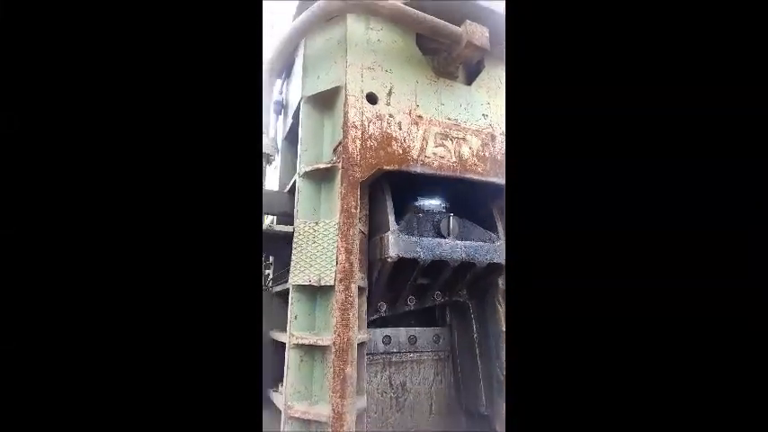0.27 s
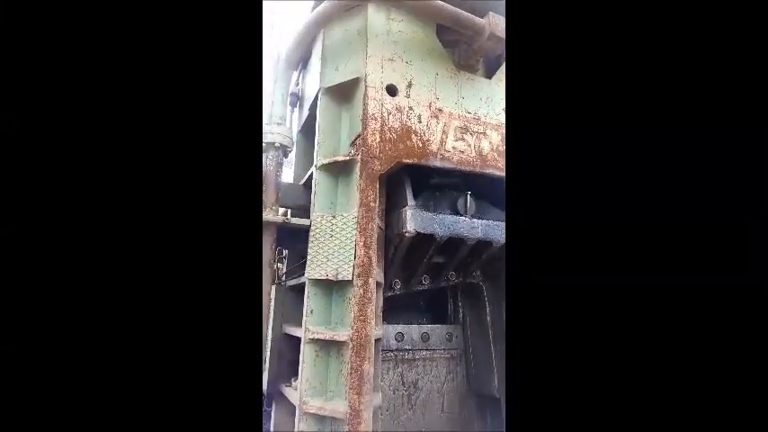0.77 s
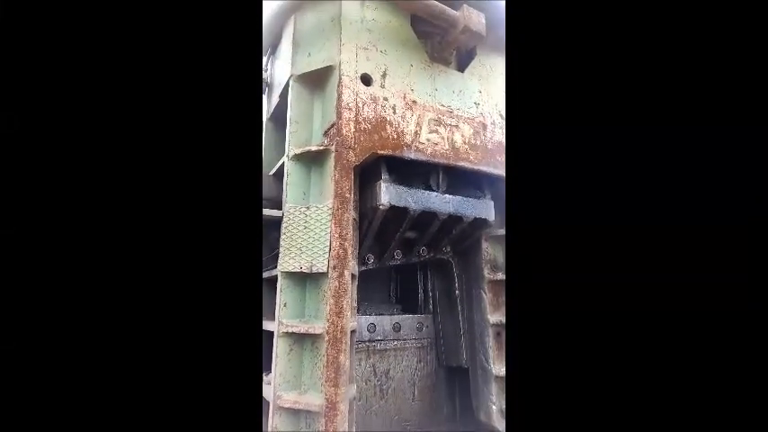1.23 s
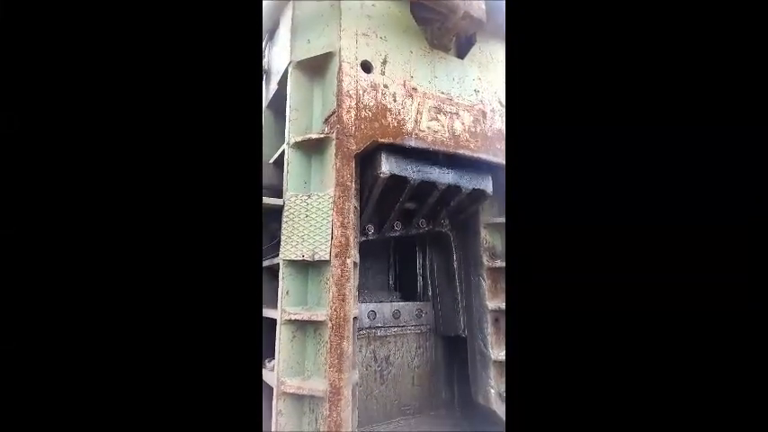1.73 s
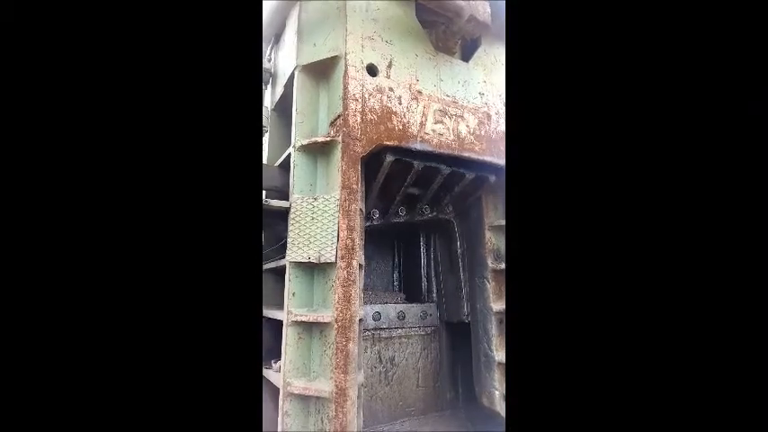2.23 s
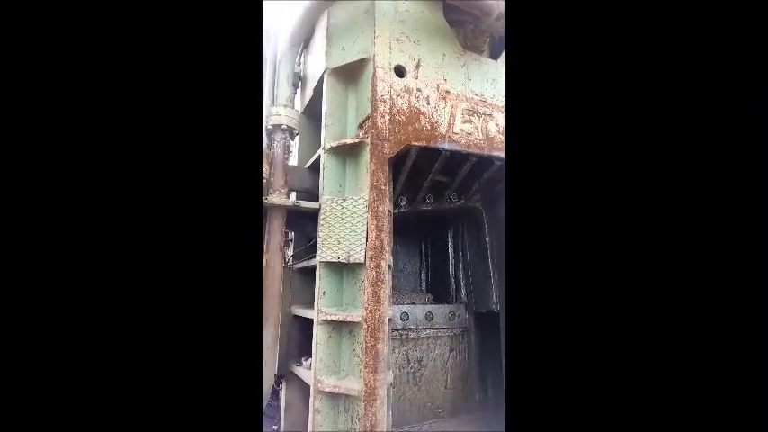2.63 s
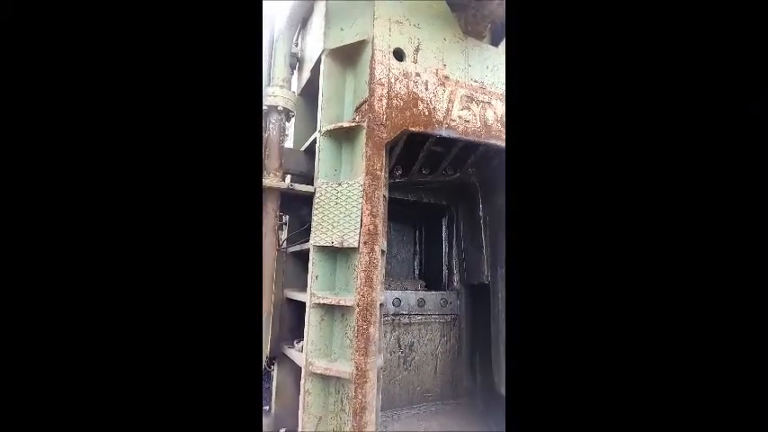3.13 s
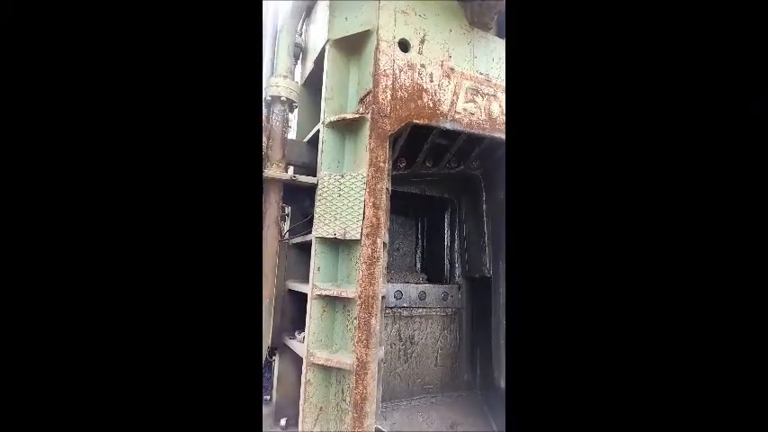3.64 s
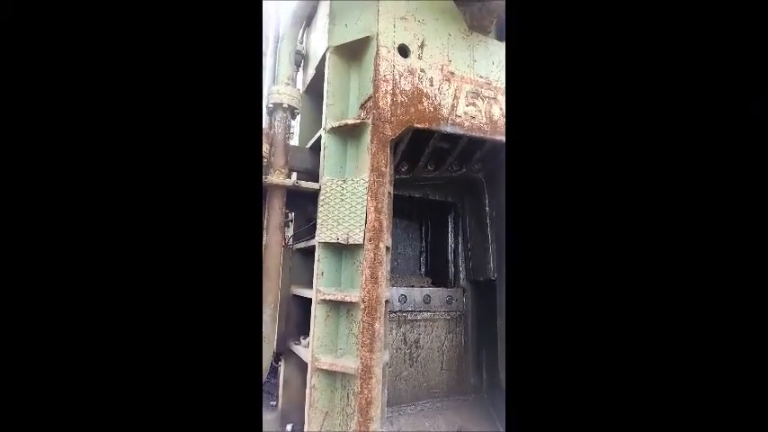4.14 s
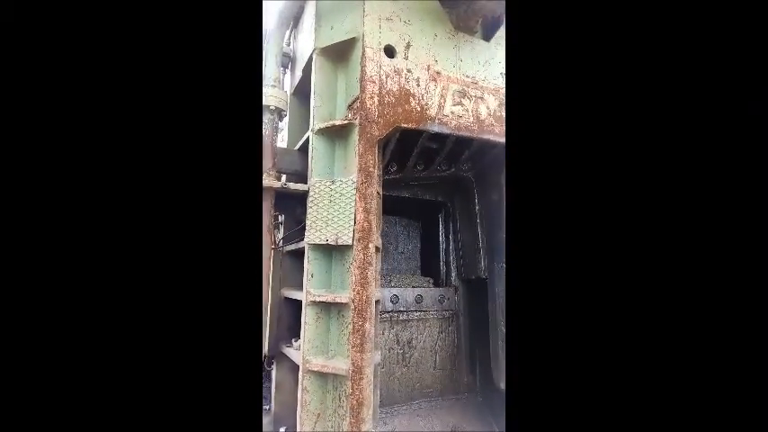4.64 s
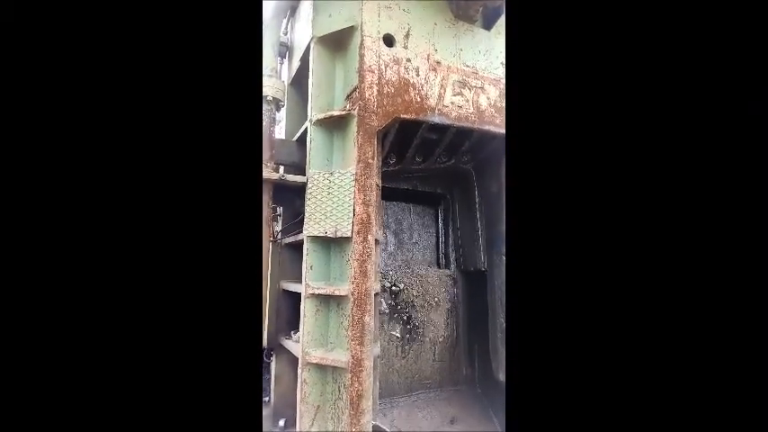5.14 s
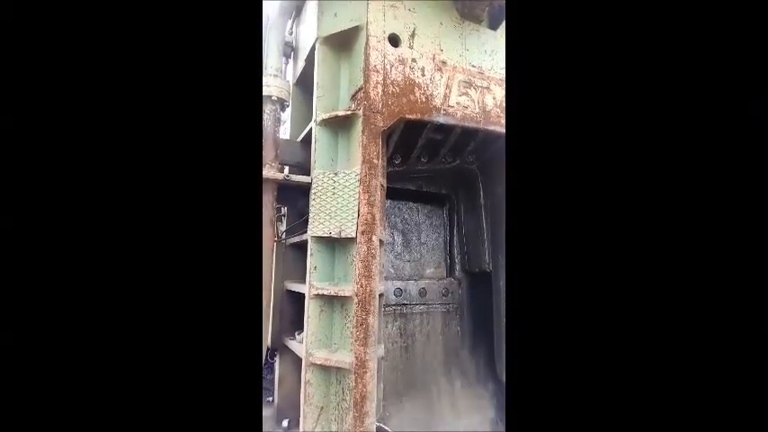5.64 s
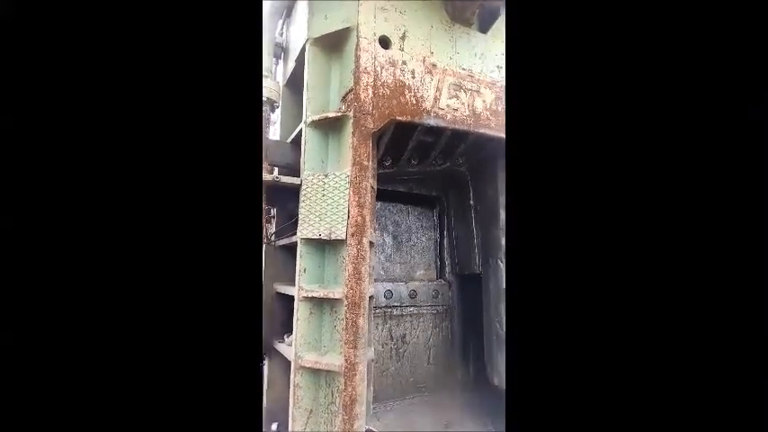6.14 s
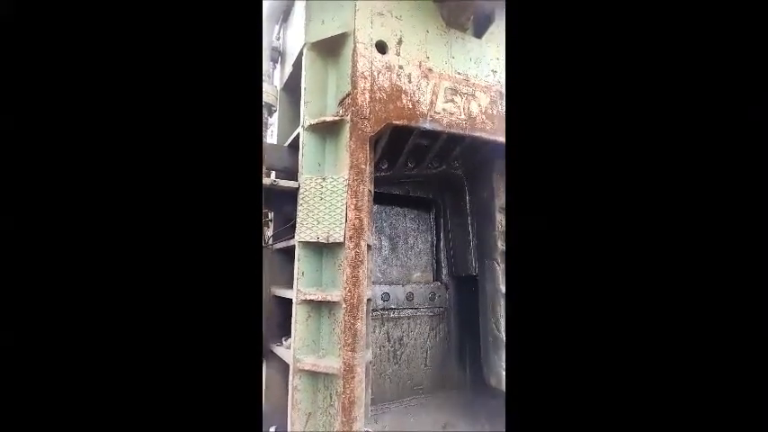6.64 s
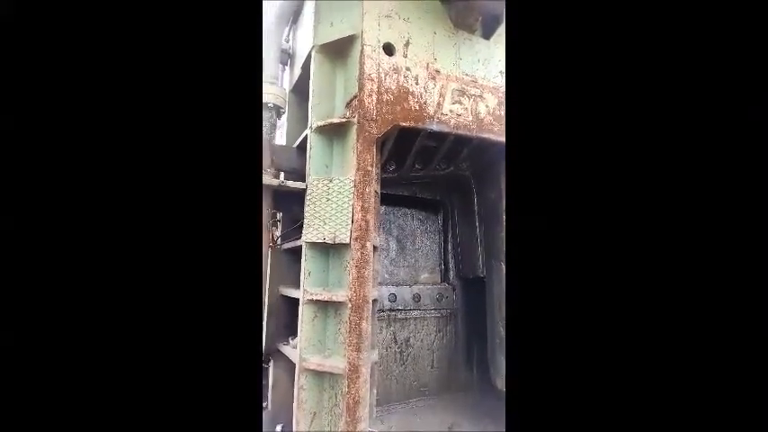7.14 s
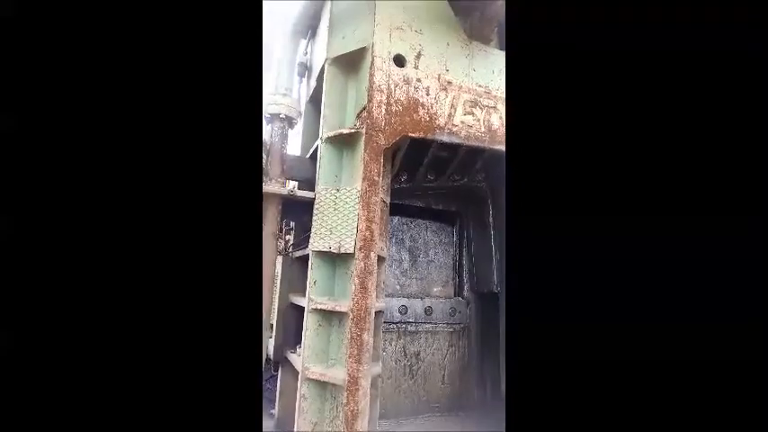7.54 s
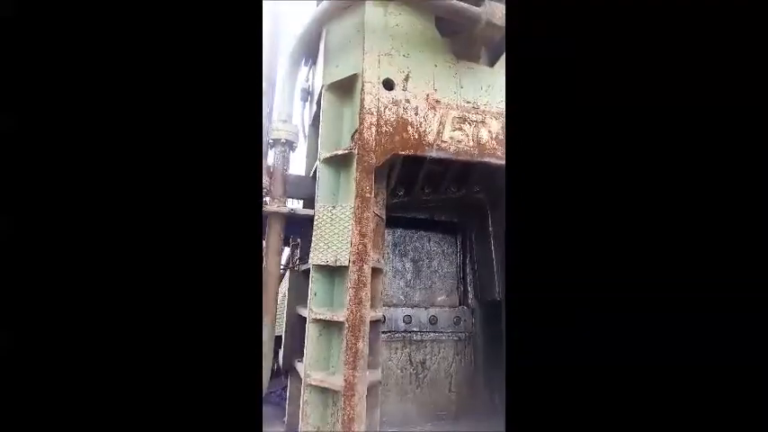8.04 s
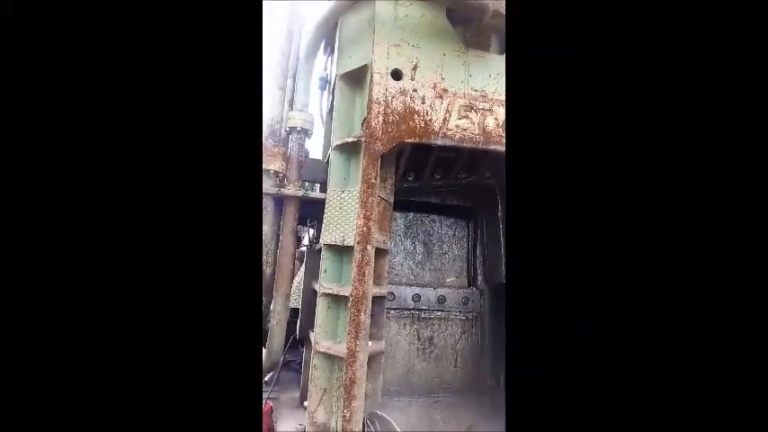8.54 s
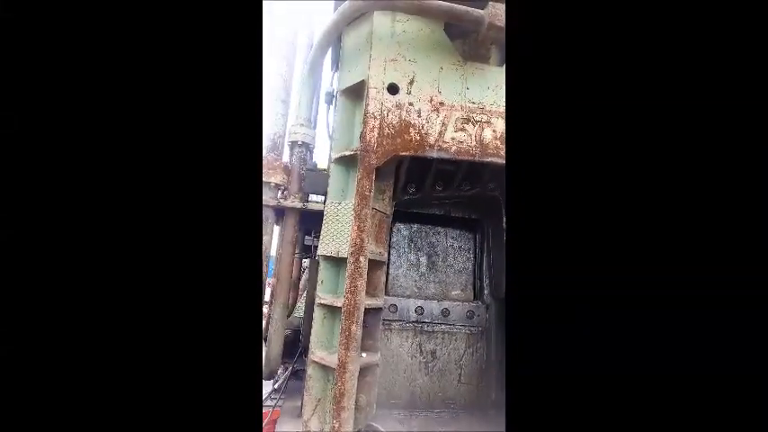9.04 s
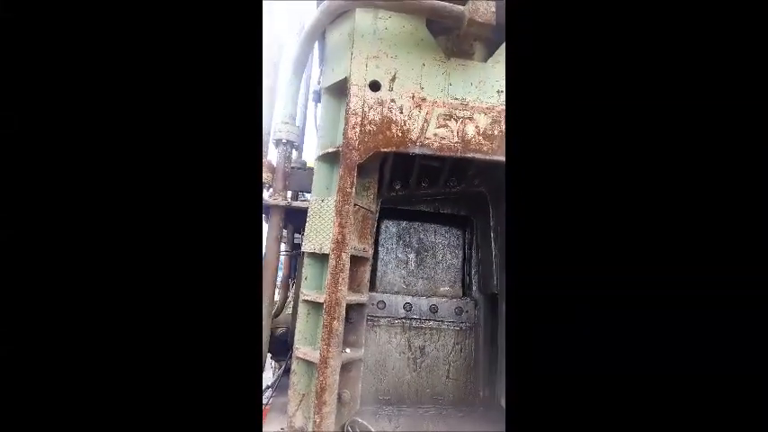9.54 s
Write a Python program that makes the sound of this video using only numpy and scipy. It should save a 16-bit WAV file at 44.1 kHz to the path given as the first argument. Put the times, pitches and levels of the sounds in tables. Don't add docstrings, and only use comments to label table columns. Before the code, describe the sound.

Outdoors in a scrapyard, a few metres from a large hydraulic shear, heard through a phone. Low pump whine and broad motor roar swell up, with hissing oil. A hard double knock on plate makes the level dive, followed by thin high squealing chatter. The drone returns, another blow lands, scrap tumbles down rattling and ringing, and the machine hums on alone.

```python
import sys
import numpy as np
from scipy import signal
from scipy.fft import rfft, irfft
from scipy.io import wavfile
from scipy.ndimage import uniform_filter1d

SR = 44100
rng = np.random.default_rng(int(sys.argv[2]) if len(sys.argv) > 2 else 0)


def volts_from_db(level):
    exponent = np.asarray(level, float) / 20
    return 10 ** exponent


def store_pcm(level_fs):
    pcm = np.round(np.clip(level_fs, -1, 1) * 32767).astype(np.int16)
    wavfile.write(sys.argv[1], SR, np.atleast_2d(pcm).T)


N = 431738
T = np.arange(N) / SR
HZ = np.fft.rfftfreq(N, 1 / SR) + 1e-3

# (time [s], level [dB])
GAIN = [(0, -15.5), (.4, -11), (1.3, -2), (2.2, 0), (3.32, -1), (3.4, -13), (3.65, -9), (4.06, -8),
        (4.4, -2.5), (4.75, -1), (5.38, -.5), (5.47, -7.5), (6.33, -5.5), (6.5, -6.5), (7.1, -0.24),
        (7.9, 0.3), (8.0, -1), (9.79, 0.26)]


def on_time(table):
    s, *columns = np.transpose(table)
    return [np.interp(T, s, c) for c in columns]


def on_hz(table):
    hz, *columns = np.transpose(table)
    return [np.interp(np.log(HZ), np.log(hz), c) for c in columns]


def in_stages(table):
    changeover_s = 0.093
    s, *columns = np.transpose(table)
    row = np.maximum(np.searchsorted(s, T, side="right") - 1, 0)
    return [uniform_filter1d(c[row], int(changeover_s * SR)) for c in columns]


def walk(rate):
    hold = int(SR / rate)
    steps = np.repeat(rng.standard_normal(N // hold + 1), hold)
    return 1.368 * uniform_filter1d(uniform_filter1d(steps, hold), hold)[:N]


def unit(x):
    return x / np.sqrt(np.mean(x ** 2))


def panned(x, pan_db):
    return x * volts_from_db(np.array([[pan_db], [-pan_db]]) / 2)


def ports(source, scattered=0.):
    # (frequency [Hz], left minus right [dB], share from the far side [0-1], unrelated share [0-1])
    port_curves = [(30, 7, 0.6, 0.1), (90, -0.5, .1, 0.21), (250, -4.5, 0.12, 0.27), (454, -4.5, 0.3, 0.34),
                   (760, -4, 0.4, 0.09), (1450, 1.2, 0.52, 0.02), (2450, 0.8, 0.87, 0.02),
                   (3400, -4.5, 0.9, 0.18), (4400, 3.5, 0.25, 0.54), (5230, 1.2, .9, 0.14),
                   (7300, 1, 0.8, 0.55), (9800, 2, .55, 0.62), (11000, -2.5, 0.2, 0.14),
                   (12400, -1, 0.1, 0.4), (14200, -3, 0, 0.04), (15100, 3, .01, 0.14)]
    # (frequency [Hz], lag [half turns])
    port_lag = [(60, .14), (260, .05), (430, .14), (800, .02), (1290, 0), (2450, .93), (2780, 1.07),
                (4950, 2.92), (5500, 3.08), (7800, 5), (10200, 7), (12850, 9), (15110, 11), (15600, 11.4)]
    pan_db, far, alone = on_hz(port_curves)
    far = np.clip(far, 0, 1) / 2
    alone = np.clip(alone + scattered, 0, 1)
    turn = np.exp(.5j * np.pi * np.interp(HZ, *np.transpose(port_lag)))
    turns = np.array([turn.conj(), turn])
    near, other, left, right = (rfft(source()) for _ in range(4))
    shared = np.sqrt(1 - far) * near * turns + np.sqrt(far) * other * turns.conj()
    both = np.sqrt(1 - alone) * shared + np.sqrt(alone) * np.array([left, right])
    return irfft(both * volts_from_db(np.array([pan_db, -pan_db]) / 2), N)


def roar_db():
    # (start [s], frame rumble [dB], motors [dB], oil [dB], fans [dB])
    stages = [
        (0, -27, -24.5, -29.5, -25.5),
        (3.36, -24.5, -23, -29.5, -26.5),
        (4.2, -25.5, -23.5, -31, -26),
        (5.6, -26.5, -22.5, -29.5, -26),
        (6.45, -24, -22.5, -30.5, -26),
        (8.8, -24.5, -25, -31.5, -27),
        (9.5, -25, -24.5, -31.5, -29.5),
    ]
    pour_rise = [0.5, -1, 4, 7.5]
    start_s, rise_s, hold_s, fall_s = 5.49, 0.14, 0.39, .25
    pour = np.interp(T, np.cumsum([start_s, rise_s, hold_s, fall_s]), [0, 1, 1, 0])
    gain_db = on_time(GAIN)[0]
    return [db + more * pour + gain_db for db, more in zip(in_stages(stages), pour_rise)]


def tone(phase, db, pan_db, wobble):
    level = np.sqrt(2) * volts_from_db(db + 0.58 * walk(9))
    return panned(level * np.sin(phase + wobble * walk(14)), pan_db)


def pumps():
    # (start [s], piston rate [Hz], multiple 1 [dB], multiple 2 [dB], multiple 5 [dB])
    piston_stages = [(0, 208.8, -17, -37.5, -47), (1.7, 209, -18.5, -34, -52), (3.36, 209.6, -13, -32, -40),
                     (3.56, 209.8, -13.5, -31.5, -30), (3.87, 209.5, -32.5, -34.5, -52),
                     (4.76, 208.6, -20, -37, -50), (4.88, 207, -21, -22.5, -57),
                     (5.4, 208.9, -30, -37.5, -49), (7.6, 209.2, -29.5, -40.5, -46),
                     (8.8, 208.2, -28, -33, -48)]
    piston_pans = [-4, 5, 2, -5, -1, 1.5]
    # (time [s], tooth rate [Hz], level [dB])
    gear_line = [(0, 324.7, -51), (.6, 329.4, -46), (1.5, 330, -33), (3.25, 330, -31.5), (3.36, 327.3, -49),
                 (4.7, 334, -35), (5, 327, -36), (5.35, 329, -36), (5.5, 328.5, -50.5), (9.79, 333, -55)]
    hz, first, second, fifth = in_stages(piston_stages)
    phase = 2 * np.pi * np.cumsum(hz + 0.6045 * walk(3)) / SR
    orders = [1, 2, 3, 4, 5, 7.04]
    levels = [first, second, first - 21, first - 24.5, fifth, -36.5]
    gain_db = on_time(GAIN)[0]
    out = np.zeros((2, N))
    for k, db, pan_db in zip(orders, levels, piston_pans):
        sway_db = min(k - 1, 1) * 2.4 * walk(6)
        out += tone(k * phase, db + gain_db + sway_db, pan_db, wobble=0.17 * k)
    hz, db = on_time(gear_line)
    gear_phase = 2 * np.pi * np.cumsum(hz) / SR
    return out + tone(gear_phase, db - .3 + 0.66 * walk(4.1), -12.0, wobble=0.28)


def knocks():
    # (time [s], level [dB], low mode [Hz], high mode [Hz], t60 [s])
    ram_knocks = [
        (3.322, -31, 1250, 2850, .17),
        (3.349, -10.5, 599, 785, .14),
        (3.353, -16.5, 459, 694, 0.39),
        (5.395, -11, 1447, 1540, 0.12),
    ]
    chute_knocks = [
        (5.801, -12, 598, 944, .11),
        (5.835, -24, 611, 924, 0.15),
        (5.971, -19.5, 697, 972, 0.13),
        (6.05, -20.5, 1265, 994, 0.24),
        (6.195, -18, 657, 1350, .2),
    ]
    ram_pan_db, chute_pan_db = -1, -8.5
    out, t = np.zeros((2, N + SR)), T[:SR // 2]
    blows = [(*row, ram_pan_db) for row in ram_knocks] + [(*row, chute_pan_db) for row in chute_knocks]
    for s, db, low_hz, high_hz, t60, pan_db in blows:
        hz = np.array([[low_hz], [high_hz], [1.08 * low_hz], [.93 * high_hz]])
        ring = np.array([0.95, 0.74, 0.23, 0.31]) @ np.sin(2 * np.pi * hz * t)
        attack = np.minimum(t / 0.00058, 1)
        out[:, int(s * SR):][:, :len(t)] += panned(volts_from_db(db - 60 * t / t60) * ring * attack, pan_db)
    return out[:, :N]


def clatter():
    # (time [s], level [dB], centre [Hz], rattle time [s], spread [octaves])
    jolts = [(3.311, -15.5, 11000, .004, 0.73), (3.319, -11.5, 1640, .0092, 0.85),
             (3.346, -17.5, 8000, 0.0026, 1.2), (3.349, -14, 900, 0.0084, 0.66),
             (3.36, -20, 520, 0.036, 0.97), (4.212, -21, 120, .025, 0.61), (4.27, -19.5, 400, 0.043, 0.99),
             (5.394, -14, 5960, 0.0074, 2.1), (5.39, -21, 75, .02, .48), (5.41, -16.5, 740, 0.073, .9),
             (3.325, -26.5, 85, 0.034, 0.36), (3.35, -19.5, 1900, 0.0028, 0.67),
             (5.44, -23, 141, 0.057, 0.74), (5.505, -17, 400, .008, 1), (7.88, -20.5, 1502, .014, 1.8),
             (7.91, -25, 1500, 0.0084, 1.6)]
    # (time [s], level [dB], centre [Hz], rattle time [s])
    falls = [(4.531, -18, 6760, 0.01), (4.585, -27, 11000, .008), (4.715, -26.5, 9000, .009),
             (4.831, -22.5, 8000, 0.012), (5.23, -25, 9000, .007), (5.479, -29, 11000, .0015),
             (5.483, -22, 11000, .002), (5.498, -23, 9000, .0015), (5.548, -24, 14000, 0.0069),
             (5.625, -21.5, 9000, 0.026), (5.649, -23.5, 7040, 0.032), (5.722, -20, 9960, 0.0019),
             (5.73, -18, 9100, 0.0022), (5.755, -19.5, 3400, 0.014), (5.761, -17, 9000, .031),
             (5.913, -14, 14040, .002), (5.918, -10.5, 11000, 0.0025), (5.921, -21.5, 7960, 0.022),
             (6.015, -20.5, 5530, .03), (6.062, -26, 2480, 0.03), (6.114, -20.5, 10000, 0.023),
             (6.192, -19, 2300, 0.021), (6.31, -23.5, 752, 0.0086), (6.405, -23, 800, .014),
             (6.355, -29, 8060, .0013), (6.368, -18, 12100, .004), (6.369, -20.5, 10100, 0.028)]
    fall_spread_oct, ring_db = 0.96, 4
    tail_per_rattle = 10.7
    out, t = np.zeros(N + SR), T[:SR // 2]
    f = np.fft.rfftfreq(len(t), 1 / SR) + 1
    for s, db, centre_hz, hold, spread in [*jolts, *[(*row, fall_spread_oct) for row in falls]]:
        grit_db = 4 * np.repeat(rng.standard_normal(len(t) // 45), 45)
        contacts = rng.standard_normal(len(t)) * volts_from_db(grit_db)
        colour = np.exp(-.5 * (np.log2(f / centre_hz) / spread) ** 2) / np.sqrt(f)
        favour = np.interp(f, np.arange(0, SR / 2, 60), rng.standard_normal(SR // 120 + 1))
        colour = colour * volts_from_db(ring_db * favour)
        attack = np.minimum(t / (0.0015 + 0.047 * hold), 1)
        tail = volts_from_db(-60 * np.maximum(t - hold, 0) / (tail_per_rattle * hold))
        rattle = unit(irfft(rfft(contacts) * colour, len(t)))
        out[int(s * SR):][:len(t)] += volts_from_db(db) * rattle * tail * attack
    return out[:N]


def scrap():
    # (time [s], level [dB], three modes [Hz])
    struck_pieces = [(4.532, -34, 3760, 10820, 15460), (5.396, -35, 3520, 7150, 15288),
                     (5.63, -35, 5329, 10260, 11638), (5.757, -21.5, 3560, 8677, 10680),
                     (5.76, -37, 8225, 8957, 3470), (5.92, -36, 9410, 10560, 12575),
                     (5.921, -39, 2220, 5996, 15385), (6.02, -23.5, 3620, 5070, 8419),
                     (6.022, -25.5, 3440, 5996, 4400), (6.117, -24, 14814, 12930, 8279),
                     (6.12, -45, 3930, 6430, 9668), (6.024, -35, 2460, 7600, 10777),
                     (5.762, -32, 9571, 4340, 11910), (6.376, -29, 10088, 11430, 4970),
                     (6.196, -28.5, 1830, 2250, 2476), (6.2, -27.5, 4580, 5100, 5178),
                     (6.372, -19, 15180, 10766, 14200), (6.372, -28.5, 6020, 5300, 9600),
                     (6.4, -30, 1675, 1785, 15331)]
    t60_s, damping = .4, .5
    out, t = np.zeros(N + SR), T[:SR // 2]
    for s, db, *hz in struck_pieces:
        pairs = np.outer([1, 1.013], hz).reshape(-1, 1)
        fade = volts_from_db(-60 * t / t60_s * (pairs / 4000) ** damping)
        modes = fade * np.sin(2 * np.pi * (pairs * t + rng.random(pairs.shape)))
        ring = np.array([1.2, 1.1, 1, .8, .75, .7]) @ modes
        out[int(s * SR):][:len(t)] += volts_from_db(db) * ring * np.minimum(t / 0.0017, 1)
    return out[:N]


def squeal():
    # (frequency [Hz], level [dB])
    plate_modes = [(11084, 0), (12730, 5), (13290, 6), (14470, 11)]
    # (time [s], level [dB])
    pings = [(3.37, -46), (3.41, -47), (3.472, -33), (3.52, -44), (3.557, -34), (3.58, -43), (3.61, -44),
             (3.657, -37), (3.69, -45), (3.748, -36), (3.785, -30)]
    out, t = np.zeros(N), T[:SR // 4]
    hz, mode_db = np.transpose(plate_modes)[:, :, None]
    for s, db in pings:
        loss, phase = rng.random((2, len(plate_modes), 1))
        fade = volts_from_db(mode_db - 6 * loss - 60 * t / .13)
        ping = fade * np.sin(2 * np.pi * (hz * t + phase))
        out[int(s * SR):][:len(t)] += volts_from_db(db) * ping.sum(axis=0) * np.minimum(t / .004, 1)
    return out


def oil_return(hz=5050, width_hz=400, db=-10, end_s=3.33):
    band = np.exp(-.5 * ((HZ - hz) / width_hz) ** 2)
    hiss = irfft(rfft(rng.standard_normal((2, N))) * band, N)
    return unit(hiss) * volts_from_db(roar_db()[2] + db) * (T < end_s)


def roar():
    region_edges = [300, 2400, 10000]
    region_trims = [3.47, 1.52, 3.2, 4.15]
    # (frequency [Hz], level per Hz [dB])
    turbulence = [(25, -22), (60, -9.5), (110, -4.5), (190, 8), (280, 0), (500, -4.5), (900, -6.5),
                  (1450, -6.5), (2300, -10), (4000, -12), (6000, -16), (9500, -19.5), (13800, -14.5),
                  (15400, -11.5)]
    # (frequency [Hz], width [Hz], boost [dB])
    housings = [(89.5, 7, 4), (125, 12, 2.5), (255, 18, 4), (590, 7.3, 12), (1212, 25, 7), (1378, 26, 4),
                (1818, 13, 7.5), (2000, 17, 5.5), (3840, 40, 5.5), (13830, 500, 5.5)]
    flutter_db = [0.71, 1.33, 1.08, 1.03]
    shape = volts_from_db(on_hz(turbulence)[0])
    for hz, width, db in housings:
        shape = shape * (1 + (volts_from_db(db) - 1) / (1 + (2 * (HZ - hz) / width) ** 2))
    region = np.searchsorted(region_edges, HZ)
    swell = [volts_from_db(db + trim + f * walk(11) + .5 * f * walk(90))
             for db, trim, f in zip(roar_db(), region_trims, flutter_db)]

    def draw():
        noise = rfft(rng.standard_normal(N)) * shape
        return sum(gain * unit(irfft(noise * (region == k), N)) for k, gain in enumerate(swell))
    return ports(draw)


def scene():
    machine = roar() + oil_return() + pumps()
    loose_metal = ports(lambda: clatter() + scrap() + squeal(), scattered=0.027)
    return machine + loose_metal + knocks()


def top_cut(x):
    return signal.sosfilt(signal.butter(12, 16240, fs=SR, output="sos"), x)


def record(dry):
    low_pass = signal.ellip(12, .2, 100, 15380, fs=SR, output="sos")
    cut = signal.sosfilt(low_pass, dry)
    return top_cut(np.clip(cut, -1, 1))


dry = scene()
out = record(dry)
store_pcm(out)
```